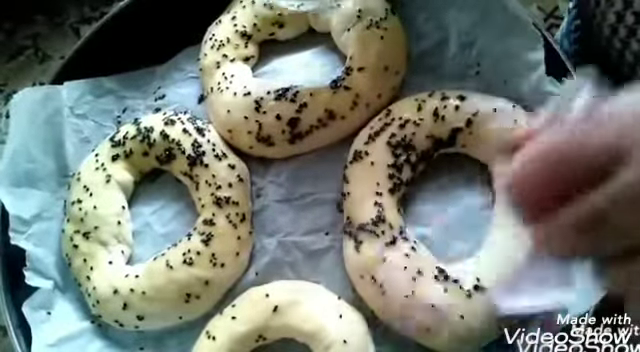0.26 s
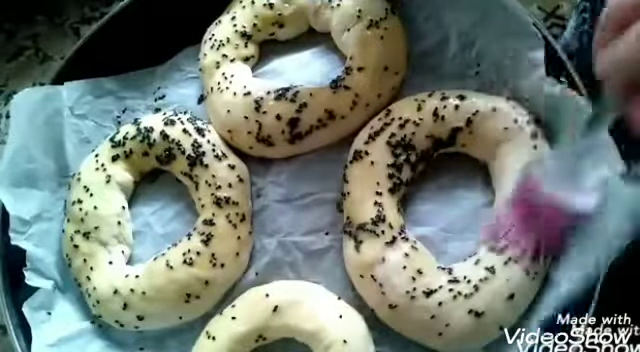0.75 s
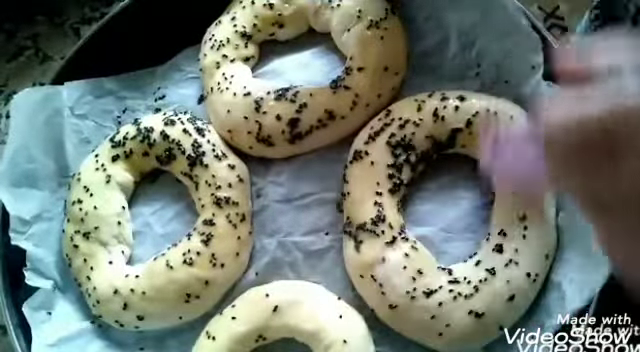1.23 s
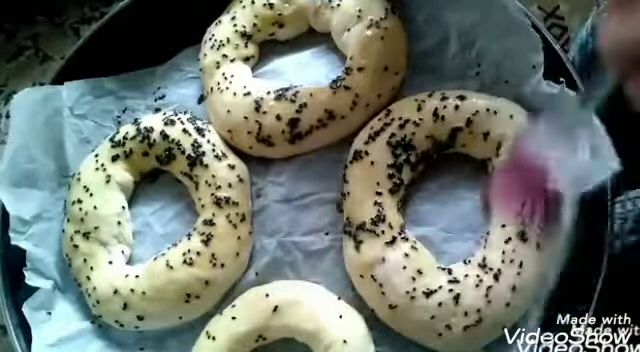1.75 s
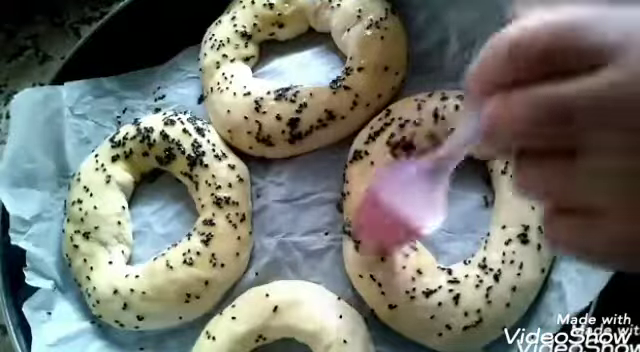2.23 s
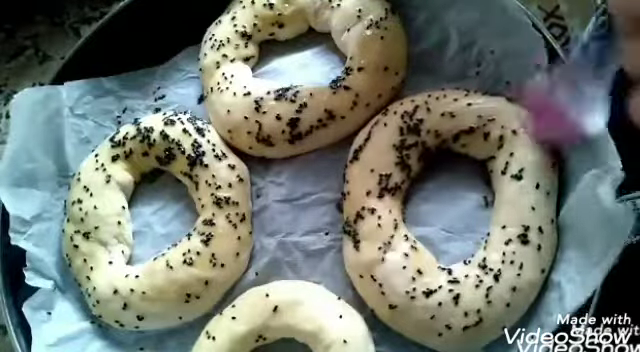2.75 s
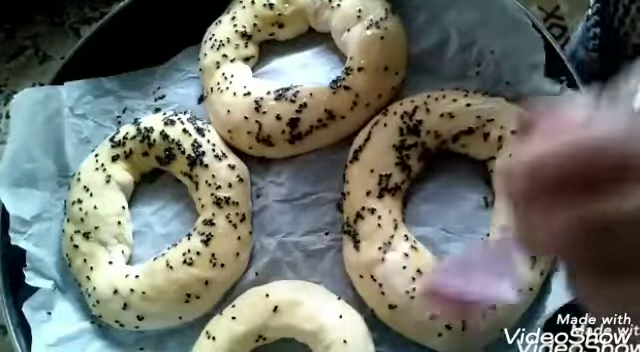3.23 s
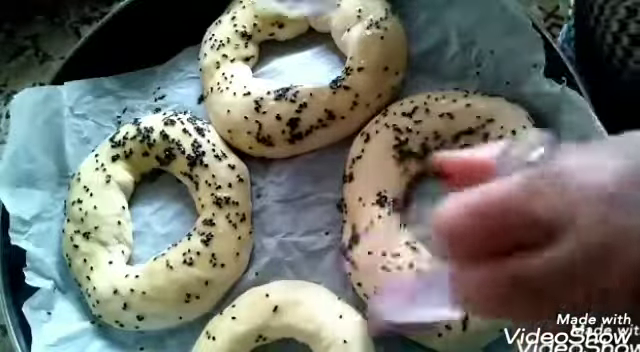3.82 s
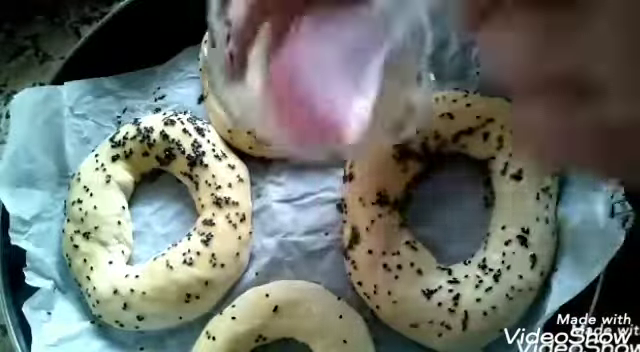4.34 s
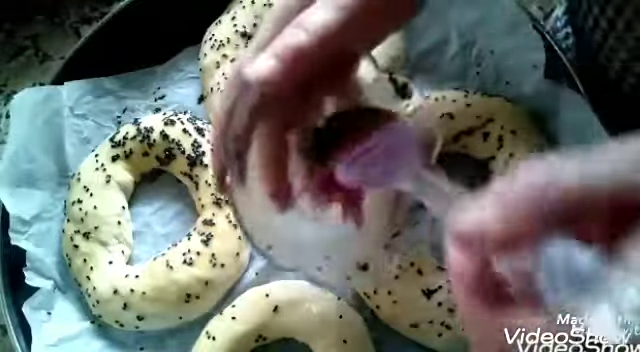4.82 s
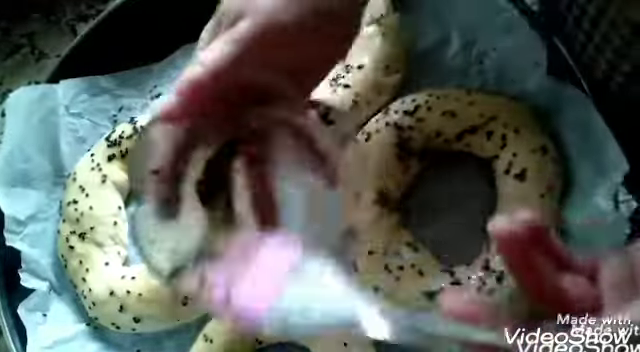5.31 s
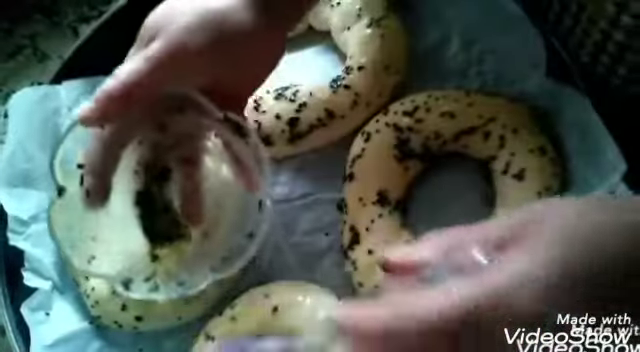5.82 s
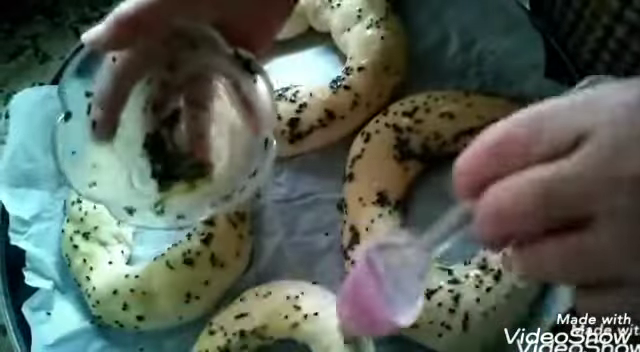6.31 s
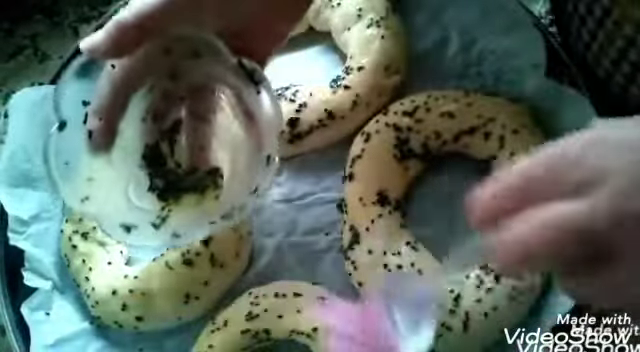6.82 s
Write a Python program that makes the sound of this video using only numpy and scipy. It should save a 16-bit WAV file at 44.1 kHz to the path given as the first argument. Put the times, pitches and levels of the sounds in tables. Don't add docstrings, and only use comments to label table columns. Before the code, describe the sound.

A soft brush dabs and sweeps over dough rings while baking paper crackles and snaps beneath, then quieter dabs and taps in a glass bowl.

```python
import sys
import numpy as np
from scipy import signal
from scipy.fft import rfft, irfft, next_fast_len
from scipy.io import wavfile
from scipy.ndimage import uniform_filter1d

SR = 44100
rng = np.random.default_rng(int(sys.argv[2]) if len(sys.argv) > 2 else 0)


def file_out(sig):
    cols = np.atleast_2d(sig).T
    lim = np.clip(cols, -1, 1)
    pcm = np.round(lim * 32767).astype(np.int16)
    wavfile.write(sys.argv[1], SR, pcm)


def makeup_ratio(level_db):
    decades = np.asarray(level_db, float) / 20
    return 10 ** decades


N = 311346

# [f/Hz, level/dB per Hz]
DRONE_SPECTRUM = [(18, -66), (30, -22), (64, -18), (97, 4), (169, -7), (199, -4), (283, -22.5),
                  (397, -31.5), (487, -21), (532, -29), (768, -26.5), (1000, -17), (1300, -56),
                  (2200, -120)]
# [t/s, level/dB]
DRONE_LEVEL = [(0.0, -45.5), (0.06, -59.5), (0.79, -60), (0.88, -50.5), (1.14, -66.5), (1.32, -48),
               (1.4, -57), (1.97, -56), (2.77, -61), (2.85, -45.5), (2.95, -56.5), (3.01, -47),
               (3.6, -64.5), (3.95, -58), (4.13, -63.5), (4.42, -57), (6.63, -59.5), (7.06, -58)]
# [f/Hz, correlation/1]
LIKENESS = [(33, 1), (60, 1), (240, 0.65), (940, -3), (3720, 0.57), (14700, -0.01)]
# [f/Hz, width/Hz, level/dB, left-right/dB]
SHREDS = [(993, 140, -83.5, 3), (1850, 190, -86.5, 0.5), (1181, 100, -80.5, 23), (1453, 200, -70, -6),
          (5270, 65, -92.5, 18), (11200, 430, -91, -9), (10300, 190, -89.5, 10.5), (2920, 280, -94, 7),
          (3930, 270, -97, 5), (8800, 1100, -96, -8.5)]
# [t/s, level/dB]
SHRED_LEVEL = [(0, -3.5), (.33, 2), (.4, 3), (1.5, 1.5), (1.6, -1), (1.8, -2.5), (2.25, 2.5), (2.5, -5.5),
               (2.76, 4), (2.82, 9), (3.45, 2.5), (3.56, -7), (3.75, 0), (4.1, -6), (4.25, -9.5),
               (4.4, -2.5), (4.9, -6.5), (5.2, 3), (5.9, 4.5), (6.1, 0), (6.35, -2.5), (6.7, -2.5),
               (7.06, 4.5)]

# [t/s, hold/s, level/dB, rise/s, fall/s]; rise and fall span SPAN_DB
SWEEPS = [(0.03, 0.026, -62, 0.019, .05), (0.129, 0.11, -49.5, 0.037, 0.1), (.23, 0.055, -52, .1, 0.11),
          (.75, 0.054, -57, .06, .1), (1.753, 0.1, -50.5, 0.011, 0.055), (2.459, 0.17, -51, 0.032, 0.35),
          (3.703, 0.0011, -60.5, 0.0032, 0.08), (3.73, .1, -51, .03, 0.19), (3.93, 0.014, -62, .1, 0.085),
          (6.02, 0.00083, -62, 0.052, 0.095), (6.099, 0.00081, -56, .02, 0.21)]
# [t/s, hold/s, level/dB, rise/s, fall/s]
PRESSES = [(.39, 0.0008, -36, 0.034, 0.081), (.852, 0.034, -37, 0.026, 0.06), (.81, 0.028, -48, 0.15, .05),
           (.93, 0.011, -33.5, .05, 0.091), (1.12, 0.041, -42, 0.3, 0.16),
           (1.171, 0.0051, -33, 0.0067, 0.046), (1.29, .001, -27, 0.021, 0.099),
           (1.38, 0.21, -51.5, .05, 0.17), (1.4, 0.03, -48.5, .03, 0.077), (1.21, 0.016, -41.5, 0.012, .06),
           (.9, 0.016, -39, 0.022, .05), (1.86, 0.0012, -33, 0.045, 0.063),
           (1.889, 0.011, -36, 0.012, 0.08), (1.945, 0.048, -37.5, 0.0065, 0.084),
           (2.004, 0.036, -43, .01, 0.096), (2.075, 0.0085, -41, 0.09, 0.15),
           (2.124, .035, -42, 0.0088, 0.02), (2.81, 0.012, -38, 0.023, 0.15),
           (2.91, 0.024, -39.5, 0.023, 0.081), (2.975, 0.032, -38, 0.0067, 0.079),
           (3.018, 0.02, -32.5, 0.013, 0.076), (3.069, 0.062, -34.5, 0.0088, .08),
           (3.135, 0.039, -28, 0.029, 0.11), (3.21, 0.015, -43, 0.061, 0.077),
           (3.3, 0.00094, -45, 0.045, 0.12)]
# [t/s, hold/s, level/dB, rise/s, fall/s]
RUBS = [(.62, 0.076, -56.5, 0.15, 0.073), (4.271, .06, -68, 0.035, .1), (4.35, 0.14, -59, 0.13, 0.055),
        (2.191, 0.16, -64.5, 0.018, 0.081), (5.92, 0.27, -83.5, 0.062, 0.083),
        (6.41, 0.14, -77.5, 0.024, 0.11), (6.74, 0.26, -67, 0.027, 0.093)]
# [t/s, hold/s, level/dB, rise/s, fall/s]
DABS = [(5.8, 0.037, -54, 0.027, 0.062), (5.3, 0.00067, -49, 0.017, 0.062), (3.7, .01, -51.5, .015, 0.028),
        (5.44, 0.049, -50, 0.45, 0.26), (5.493, 0.00082, -64, 0.0041, 0.19), (5.55, 0.1, -55, 0.054, 0.074),
        (5.72, 0.0012, -43.5, 0.13, 0.058), (5.778, 0.043, -52.5, 0.035, 0.095),
        (6.8, 0.11, -56.5, 0.079, 0.25), (5.859, 0.044, -58.5, 0.042, 0.084)]
# [t/s, hold/s, level/dB, rise/s, fall/s]
WIPES = [(4.497, 0.16, -54.5, 0.0093, 0.19), (4.72, 0.11, -62.5, .05, .07), (4.82, 0.073, -55, 0.17, 0.057),
         (4.92, .04, -62, .04, .05), (4.989, 0.18, -56, 0.092, .05)]
# [paper flex/dB, push on tray/dB, left-right/dB, bristle sheen/dB]
TOUCH = [
    (-1.5, -12.5, 3.5, -5.5),
    (-7.5, -12.5, 2.5, -3),
    (-3, -3.5, 3.5, -4.5),
    (-1.5, -2, 4.5, -39.5),
    (-2, -18.5, 3, -6.5),
]
FLEX_LETS_GO = [
    0.093,
    1.4,
    0.06,
    0.044,
    0.083,
]

# [f/Hz, level/dB]
PAPER = [(710, -42), (1200, -2.5), (2170, -8), (2710, -14), (2980, -13), (5100, -7), (5920, -8),
         (8040, -6.5), (10100, -13), (12800, -8), (15000, -20.5)]
# [t/s, peak level/dB, flex against it/dB, left-right/dB]
CREASES = [(0.14, -20.5, -50, 1), (0.3863, 5, -25.5, 10), (0.817, -22, -35, 7.5), (0.851, -18.5, -22, 13.5),
           (0.8613, -8, -10, -1.5), (0.8833, -2, -28.5, 19.5), (0.9384, 0, -25, 1.5),
           (0.954, -16.5, -11.5, 15), (1.1246, -14.5, -10.5, -1), (1.1664, -12, -16, 6.5),
           (1.251, -11, -14.5, -2), (1.291, 0.5, -7, -1), (1.3368, -21, 2, -1), (1.4076, -13.5, -42, -12),
           (1.444, -16.5, -22, 10.5), (1.5537, -20, -10.5, 1), (1.652, -23.5, -18.5, -1.5),
           (1.8486, -3.5, -13, 0.5), (1.8867, -6, -27, 5.5), (1.942, -18.5, -11, 2), (2.004, -17, -5, -4.5),
           (2.073, -9.5, -19, 0), (2.1216, -26.5, 5.5, 3), (2.216, -23, -10, 2.5),
           (2.809, -10.5, -10.5, 2.5), (2.9074, -17.5, -30, -9.5), (3.0157, -9, -15, -6),
           (3.066, -14, -18, -15.5), (3.1327, 1.5, -19, -18), (3.17, -22.5, -9.5, -21),
           (0.917, -11.5, -23, 7), (1.081, -23, -21.5, 14), (1.096, -24.5, -7, -2.5),
           (1.147, -10, -18.5, -3.5), (1.3, -25, -18, 1), (1.5002, -27, -11, 1), (1.5623, -19, -24, -3),
           (1.974, -21, -16, -6), (2.0557, -15, -13, -1), (2.096, -22, -2, -1), (2.825, -15.5, -16, 2),
           (2.929, -25.5, -24.5, -7.5), (3.147, -11.5, -13, -8.5), (3.191, -17, -18, -7.5),
           (3.214, -12, -20, -12)]
# [t/s, peak level/dB, flex against it/dB, left-right/dB]
MORE_CREASES = [(1.2013, -10, -19, 9), (1.75, -36, -31, 24), (2.9725, -27, -1, 5.5), (3.229, -15.5, -34, 22),
                (3.18, -30.5, 7.5, 0), (3.7, -19, -14.5, -1), (3.817, -30, -31, 6), (4.495, -22, -40, -3),
                (4.6407, -19, -30, 7), (4.764, -25, -40, 4), (4.999, -31.5, -7.5, -7), (5.213, -22, -14, 0),
                (5.2752, -23.5, -21, 23.5), (5.3595, -19, -34, 2), (5.461, -46, 6, 7), (5.4917, -7.5, -21.5, 4),
                (5.512, -19.5, -10.5, 2), (1.2609, -11.5, -11.5, -3), (5.7989, -23.5, -5.5, 2.5),
                (6.104, -28.5, -38, 7.5)]
# [t/s, peak level/dB, left-right/dB]
SPIKES = [(0.3882, -11, -3), (0.863, -22, 6), (0.944, -12, 4), (1.1706, -19, 8), (1.1755, -19, 4),
          (1.265, -14, -2), (1.4486, -35, 9), (2.219, -32, 11), (2.9745, -33, 2), (0.8847, 0, 4),
          (1.293, -8.5, 19), (1.311, -22, 6), (1.341, -27, 5), (1.853, -8, 10), (1.89, -17, 10),
          (1.895, -19, 2), (1.901, -11, 5), (1.9445, -16, 4), (2.006, -33, -3), (2.0735, -13, -5),
          (2.122, -23, 10), (3.016, -12, -1.5), (3.068, -26, -2), (3.134, -5, 0), (3.17, -11, -6),
          (3.231, -19, 4), (3.702, -20, -2), (4.766, -27.5, -10), (5.0015, -34, -1), (5.276, -23, 6),
          (5.4928, -9.5, 5), (5.5164, -21, 3), (5.8005, -23, 6)]
# [f/Hz, width/Hz, level/dB]
TRAY = [
    (299, 54, 0),
    (472, 130, -4),
    (742, 87, -7.5),
    (1124, 27, -15.5),
]
# [t/s, peak level/dB, f/Hz]
BUMPS = [(0.105, -53, 283), (.385, -41.5, 468), (.854, -41, 450), (.884, -42, 323), (.914, -41.5, 462),
         (1.168, -44, 460), (1.266, -46.5, 293), (1.284, -39.5, 314), (1.346, -44.5, 480),
         (1.443, -47, 466), (1.754, -55, 205), (1.896, -42, 471), (1.965, -46, 135), (2.154, -50, 366),
         (2.459, -51.5, 439), (2.817, -45.5, 501), (2.833, -41.5, 340), (2.842, -38.5, 140.7),
         (2.86, -44, 385), (2.905, -47.5, 170), (2.974, -38, 468), (2.995, -43, 105), (3.036, -39, 310),
         (3.14, -41.5, 337), (3.178, -32, 471), (3.225, -43, 426), (5.257, -49.5, 315), (5.258, -49, 840),
         (5.275, -43, 910), (5.345, -52, 112), (5.49, -48.5, 99), (5.7, -56, 680), (5.715, -51, 375),
         (5.799, -46, 980), (5.85, -48, 99.5), (5.382, -56, 325), (5.555, -45.5, 330), (5.8, -51, 370),
         (5.898, -52.5, 292)]

# [t/s, f/Hz, level/dB]
SQUEAK = [
    (0.558, 680, -69),
    (0.573, 689, -49.5),
    (0.615, 715, -50.5),
    (0.635, 700, -64.5),
    (0.712, 708, -59),
    (0.762, 757, -80),
    (0.792, 684, -54),
    (0.83, 695, -101),
]
# [t/s, f/Hz, level/dB]
SWISH = [
    (4.12, 3590, -82.5),
    (4.16, 3670, -82.5),
    (4.185, 3620, -95),
    (4.2, 3670, -70.5),
    (4.225, 3920, -69),
    (4.265, 4150, -69.5),
    (4.3, 4250, -84),
]
# [t/s, f/Hz, level/dB]
WHINE = [
    (6.3, 1496, -88),
    (6.38, 1500, -70.5),
    (6.55, 1596, -68),
    (6.68, 1607, -81.5),
    (6.74, 1616, -92),
]

# [f/Hz, level/dB]
GATE = [(100, -125), (600, -102), (950, -88), (1300, -108), (1950, -88), (2900, -104), (3450, -82),
        (4000, -104), (6000, -102), (9000, -93), (12000, -99.5), (15000, -86.5)]
# [f/Hz, width/Hz, threshold slope/dB per dB]
WEAK_BANDS = [(710, 150, 2.5), (980, 59, 8.5), (1995, 520, 4.0), (3380, 340, 2)]
# [t/s, length/s, lower f/Hz, upper f/Hz]
DROPOUT = [(1.135, .055, 0, 330), (1.135, .06, 600, 850), (1.055, .045, 650, 950), (1.67, .055, 600, 1050),
           (.1, .24, 900, 1080), (2.46, .26, 880, 1060), (.55, .11, 860, 980), (6.73, .135, 3300, 3700),
           (6.93, .13, 3300, 3700), (3.005, .025, 250, 900), (0, .11, 1750, 2900), (.11, .2, 1650, 1950),
           (4.62, .13, 1600, 2050), (3.8, .1, 1750, 2150), (5.1, .13, 880, 1020), (.6, .08, 7000, 8800),
           (2.55, .2, 1800, 2100), (6.08, .16, 2000, 2350), (4.2, .08, 4400, 5000)]
# [lower f/Hz, upper f/Hz]
MURK_HZ = (1750, 5600)
# [f/Hz, width/Hz, level/dB, roll-off f/Hz]
PORTS = [
    (6027, 775, 12, 8280),
    (9980, 1430, 14.5, 22000),
]

SPAN_DB = 20
PATCHY_DB, SHEEN_HZ, LARGE_HZ = 3.6, 7000, 2500
SNAP_T60_S, SNAP_SHORTENS = 0.05, 0.53
BUMP_CYCLES, BUMP_RISE_CYCLES = 20, 1.6
THUD_LAG = 14
ROOM_T60_S, ROOM_DB, WALL_CUT_HZ = 0.22, -21, 45000


def rms_one(x):
    return x / np.sqrt(np.mean(x ** 2) + 1e-20)


def in_time(rows):
    s, *columns = np.transpose(rows)
    return [np.interp(np.arange(N) / SR, s, c) for c in columns]


def at_hz(points, hz):
    point_hz, level = np.array(points).T
    return np.interp(np.log(hz), np.log(point_hz), level)


def held(x):
    return np.repeat(x, 16)[:N]


def drift(rate, size=1):
    r = np.exp(-80 * np.pi * rate / SR)
    slow = signal.lfilter([1], [1, -2 * r, r * r], rng.standard_normal(N // 40 + 2002))[2000:]
    return np.interp(np.arange(0, N, size) / 40, np.arange(len(slow)), rms_one(slow))


def resonance(x, hz, width_hz):
    r = np.exp(-np.pi * width_hz / SR)
    zeros = [(1 - r * r) / 2, 0, (r * r - 1) / 2]
    return signal.lfilter(zeros, [1, -2 * r * np.cos(2 * np.pi * hz / SR), r * r], x + 1e-18)


def butter(x, order, hz, kind="low", rate=SR):
    return signal.sosfilt(signal.butter(order, hz, kind, fs=rate, output="sos"), x)


def sides(pan_db):
    return makeup_ratio(np.array([pan_db / 2, -pan_db / 2]))


def drone():
    rate = SR / 10
    edges = 30 * 2 ** np.arange(0, 5.2, .3)
    white = rng.standard_normal((2, 2, len(range(0, N, 10))))
    out = 0
    for k, (low, high) in enumerate(zip(edges, edges[1:])):
        mid, side = butter(white[k % 2], 2, [low, high], "band", rate)
        hz = np.sqrt(low * high)
        alike = np.clip(at_hz(LIKENESS, hz), -1, 1)
        flicker_db = 3 * drift(4, size=10) * np.clip(hz / 600, .35, 1)
        pair = np.sqrt(1 + alike) * mid + np.sqrt(1 - alike) * side * [[1], [-1]]
        out = out + makeup_ratio(at_hz(DRONE_SPECTRUM, hz) + flicker_db) * pair
    out = butter(rms_one(out), 8, 900, rate=rate)
    return signal.resample_poly(out, 10, 1, axis=1)[:, :N] * makeup_ratio(in_time(DRONE_LEVEL)[0] - 0.5)


def shreds():
    pair, let_db = rng.standard_normal((2, N)), in_time(SHRED_LEVEL)[0]
    out = 0
    for hz, width, db, pan in SHREDS:
        r = np.exp(-np.pi * width / SR)
        slow = signal.lfilter([1], [1, -2 * r, r * r], pair)
        wander_hz = 30 * held(drift(2.5, size=16))
        turn = 2 * np.pi / SR * np.cumsum(hz + wander_hz)
        shred = rms_one(slow[0] * np.cos(turn) + slow[1] * np.sin(turn))
        level_db = db + 3 * drift(5, size=16) + let_db[::16] * (hz < 2000)
        out = out + held(makeup_ratio(level_db)) * shred * sides(pan)[:, None]
    return out


def kitchen():
    return drone() + shreds()


def contact():
    t = np.arange(0, N / SR + .002, .001)
    power = np.full((len(TOUCH), len(t)), 1e-12)
    flexing = np.full(len(t), 1e-14)
    for kind, rows in enumerate((PRESSES, SWEEPS, DABS, RUBS, WIPES)):
        for s, hold, db, rise, fall in rows:
            before = np.maximum((s - t) / rise, 0)
            after = np.maximum((t - s - hold) / fall, 0)
            stroke = makeup_ratio(db - SPAN_DB * (before + after)) ** 2
            power[kind] += stroke
            flexing += stroke * makeup_ratio(TOUCH[kind][0] - SPAN_DB * after * FLEX_LETS_GO[kind]) ** 2
    total = power.sum(axis=0)
    colour = (power / total).T @ np.array(TOUCH)[:, 1:]
    rustle_db, flex_db = 10 * np.log10(total), 10 * np.log10(flexing / total)
    return in_time(np.column_stack([t, rustle_db, flex_db, colour]))


def bristle_friction(rustle_db, press, pan_db):
    clumps = makeup_ratio(press * (1.1 * drift(22) + 1.5 * drift(80)))
    slips = rng.random(N) < 5000 / SR
    sizes = makeup_ratio(2.5 * press * np.minimum(rng.exponential(1, N), 5)) * slips
    crackle = sizes * rng.choice([-1, 1], N)
    grains = rms_one(makeup_ratio(-3 * press) * (crackle + .5 * rng.standard_normal(N)))
    return clumps * grains * makeup_ratio(rustle_db + 17.0) * sides(np.clip(pan_db, -9, 9))


def sheet(stiff, flex, sheen_db, bend, cycles):
    dealt = rng.integers(0, 18, (2, N))
    dealt[1] = np.where(rng.random(N) < .3, dealt[0], dealt[1])
    out = 0
    for k, hz in enumerate(np.geomspace(2100, 13500, 18)):
        share = np.clip(np.log2(hz / 3300) / .5, 0, 1)
        patchy_db = PATCHY_DB * drift(27 if k % 2 else 10.5, size=16)
        touch = held(makeup_ratio(patchy_db + sheen_db[::16] * (hz > SHEEN_HZ)))
        if hz < LARGE_HZ:
            touch = touch * bend
        clicks = (share * stiff + (1 - share) * flex) * (dealt == k) * touch
        ring = resonance(resonance(clicks, hz, 1.64 * hz / cycles), hz, hz / 2.0)
        out = out + makeup_ratio(at_hz(PAPER, hz)) * ring
    top = signal.sosfiltfilt(signal.butter(6, SHEEN_HZ, "high", fs=SR, output="sos"), out)
    return out - top * (1 - makeup_ratio(np.clip(sheen_db + 23, -40, 0)))


def thuds():
    out = np.zeros(N + SR)
    for s, db, hz in BUMPS:
        turns = hz * np.arange(round(BUMP_CYCLES / hz * SR)) / SR
        envelope = np.minimum(turns / BUMP_RISE_CYCLES, 1) * makeup_ratio(db - 60 * turns / BUMP_CYCLES)
        start = round(s * SR)
        out[start:start + len(turns)] += envelope * np.sin(2 * np.pi * turns)
    return makeup_ratio(5.0) * np.array([out[:N], 0.86 * np.roll(out, THUD_LAG)[:N]])


def tray(push_db, knocks):
    shared = rng.standard_normal(N) + .65 * rng.standard_normal((2, N))
    rest = makeup_ratio(-71.5 + 19.5)
    shake = shared * (makeup_ratio(push_db + 15) + rest + knocks)
    out = 0
    for k, (hz, width, db) in enumerate(TRAY):
        caught = held(makeup_ratio(2.2 * drift(14, size=16)))
        out = out + (-1) ** k * makeup_ratio(db) * resonance(shake * caught, hz, width)
    return (butter(out, 2, 1300) + thuds()) * sides(2.5)[:, None]


def bursts(s, level_db, pan_db, t60s):
    out = np.zeros((2, N))
    for start, db, pan, t60 in zip(s, level_db, pan_db, t60s):
        at = round(start * SR)
        t = np.arange(min(round(0.5 * t60 * SR), N - at)) / SR
        decay = makeup_ratio(-60 * t / 0.0016) + 0.5 * makeup_ratio(-60 * t / t60)
        shape = np.minimum(t / 0.0013, 1) * decay
        out[:, at:at + len(t)] += makeup_ratio(db) * sides(pan)[:, None] * shape
    return out


def ticks(s, peak_db, pan_db):
    out = np.zeros((2, N))
    at = np.round((s + 0.00043) * SR).astype(int)
    out[:, at] = makeup_ratio(peak_db) * sides(pan_db) * rng.choice([-1, 1], (len(at), 2)).T
    return butter(out + 1e-18, 2, [2300, 9000], "band")


def paper():
    rustle_db, flex_db, push_db, pan_db, sheen_db = contact()
    press = np.clip((rustle_db + 75.0) / 22, .15, 1)
    stroke = bristle_friction(rustle_db, press, pan_db)

    s, peak_db, snap_flex_db, snap_pan_db = np.transpose(CREASES + MORE_CREASES)
    t60 = np.clip(SNAP_T60_S * makeup_ratio(-SNAP_SHORTENS * (peak_db + 11.5)), .006, .07)
    cracks = rng.standard_normal(N)
    stiff = stroke + cracks * bursts(s, peak_db + 3.0, snap_pan_db, t60)
    snap_flex = cracks * bursts(s, peak_db + snap_flex_db + 25.5, snap_pan_db, t60)
    flex = stroke * makeup_ratio(flex_db + 10.0) + snap_flex

    signs = np.where(rng.random((2, N)) < .25, -1, 1)
    broad = butter(flex * press ** 1.23 * signs, 2, [900, 2100], "band")
    bend = makeup_ratio(np.minimum(0.99 * flex_db, 0))
    rustle = butter(sheet(stiff, flex, sheen_db + 3.0, bend, cycles=6.53), 6, 2000, "high")
    tick_db = peak_db - 13.5 - 20 * np.log10(t60 / 0.0037)
    rustle = rustle + makeup_ratio(-23.5) * broad + ticks(s, tick_db, snap_pan_db)
    rustle = rustle + makeup_ratio(2.5) * ticks(*np.transpose(SPIKES))

    knocks = bursts(s, peak_db - 35.5, 0 * s, t60)
    return rustle + tray(rustle_db + push_db, knocks)


def walls(x):
    size = next_fast_len(N + SR)
    w = 2 * np.pi * np.arange(size // 2 + 1) / size
    loss = (1 + (w * SR / (2 * np.pi * WALL_CUT_HZ)) ** 2) ** 0.042
    loops = np.zeros((2, len(w)), complex)
    for k, lag in enumerate(rng.uniform(.005, 0.022, 12) * SR):
        turn = makeup_ratio(-60 * lag / SR / ROOM_T60_S) / loss * np.exp(-1j * w * lag)
        loops[k % 2] += (-1) ** (k // 2) * turn / (1 - turn)
    return irfft(rfft(x, size) * loops, size)[:, :N]


def squeak(rows, wander, wander_hz, pan_db):
    hz, level_db = in_time(rows)
    t = np.arange(N) / SR
    on = (t > rows[0][0]) & (t < rows[-1][0])
    turn = 2 * np.pi * np.cumsum(hz) / SR + wander * drift(wander_hz)
    envelope = held(makeup_ratio(level_db[::16] + 2 * drift(36.3, size=16)))
    return on * np.sqrt(2) * envelope * np.sin(turn) * sides(pan_db)[:, None]


def smooth(x, bands, frames):
    return uniform_filter1d(uniform_filter1d(x, size=bands, axis=1), size=frames, axis=2)


def suppress(x):
    hz, s, bins = signal.stft(x, SR, nperseg=1024)
    power = smooth(np.abs(bins) ** 2, 3, 3)
    level_db = 10 * np.log10(power + 1e-20)
    ragged = rms_one(smooth(rng.standard_normal(power.shape), 4, 13))

    weak = sum(slope * np.exp(-((hz - mid_hz) / width) ** 2) for mid_hz, width, slope in WEAK_BANDS)
    strict_db = -np.interp(s, *np.transpose(SHRED_LEVEL))
    gate_db = at_hz(GATE, hz + 1)[:, None] + np.outer(weak, strict_db)
    mask_db = level_db.max(axis=1, keepdims=True) - 26.5
    bar_db = np.maximum(gate_db, mask_db) + 9.4 * ragged
    keep = np.clip((level_db - bar_db) / 2.6, 0, 1)

    murk = makeup_ratio(-117 + 8.0 * ragged[0, ::-1]) * np.exp(2j * np.pi * rng.random(power.shape))
    murk = murk * ((hz > MURK_HZ[0]) & (hz < MURK_HZ[1]))[:, None]

    shut = 0
    for start, length, low_hz, high_hz in DROPOUT:
        shut = shut + np.outer((hz >= low_hz) & (hz < high_hz), (s >= start) & (s < start + length))
    edge_hz = 13900 + 750 * np.repeat(rng.standard_normal(len(s)), 4)[:len(s)]
    passed = np.where(shut > 0, .015, 1) * (hz[:, None] < edge_hz)
    return signal.istft((bins * keep + murk) * passed, SR, nperseg=1024)[1][:, :N]


def scene():
    near = paper()
    tones = squeak(SQUEAK, 0.56, wander_hz=35, pan_db=6.5)
    tones = tones + squeak(SWISH, 1.5, wander_hz=100, pan_db=9.0)
    tones = tones + squeak(WHINE, .8, wander_hz=30, pan_db=0.0)
    return near + makeup_ratio(ROOM_DB) * walls(near) + tones + kitchen()


def roll_off(x):
    return signal.sosfilt(signal.butter(12, 15300, fs=SR, output="sos"), x)


def record(dry):
    out = np.zeros_like(dry)
    for k, (hz, width, db, roll_hz) in enumerate(PORTS):
        lifted = dry[k] + (makeup_ratio(db) - 1) * resonance(dry[k], hz, width)
        out[k] = butter(lifted, 4, roll_hz)
    out = signal.sosfilt(signal.cheby2(6, 30, 15400, fs=SR, output="sos"), out)
    return roll_off(suppress(np.tanh(out)))


dry = scene()
out = record(dry)
file_out(out)
```